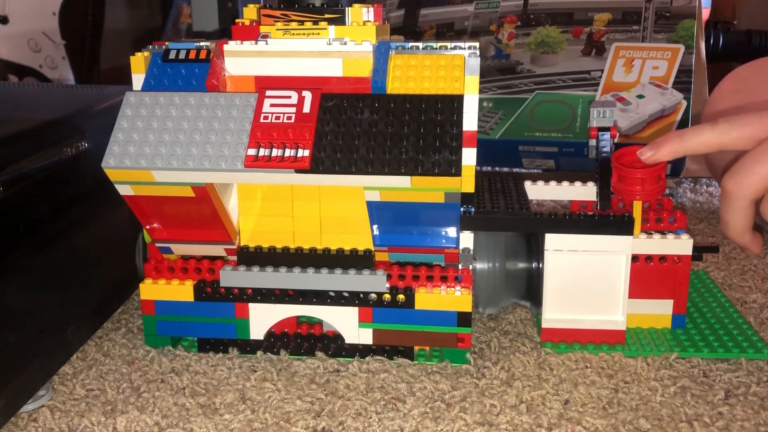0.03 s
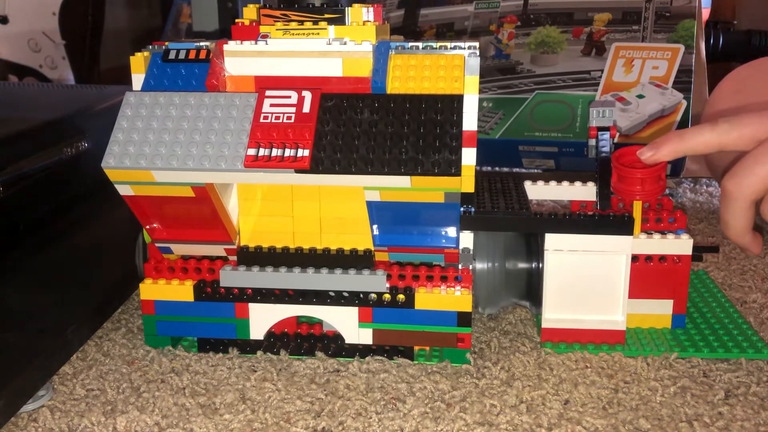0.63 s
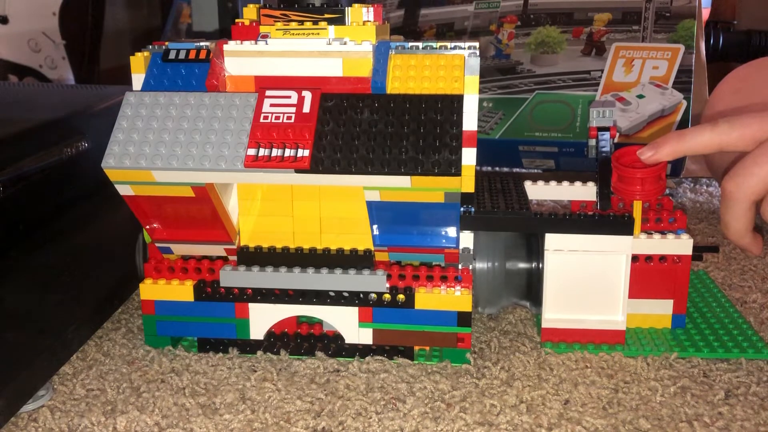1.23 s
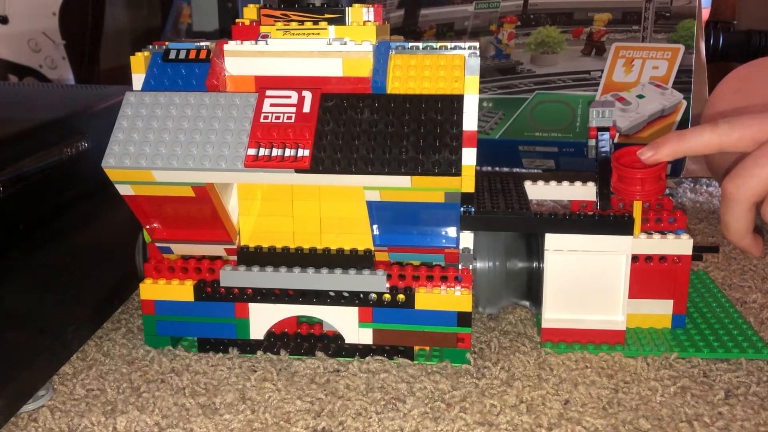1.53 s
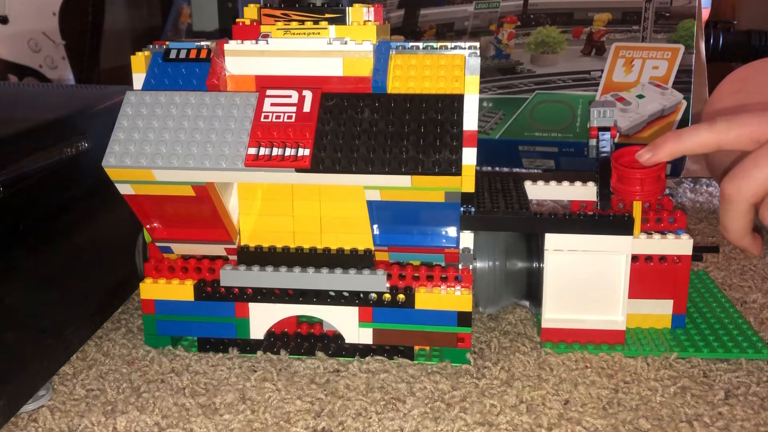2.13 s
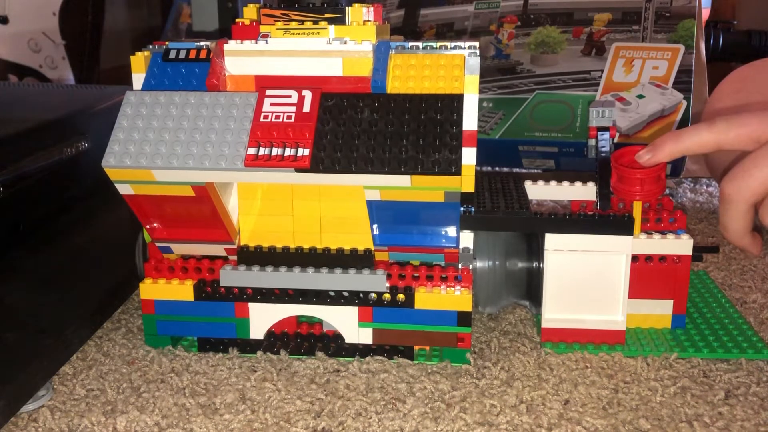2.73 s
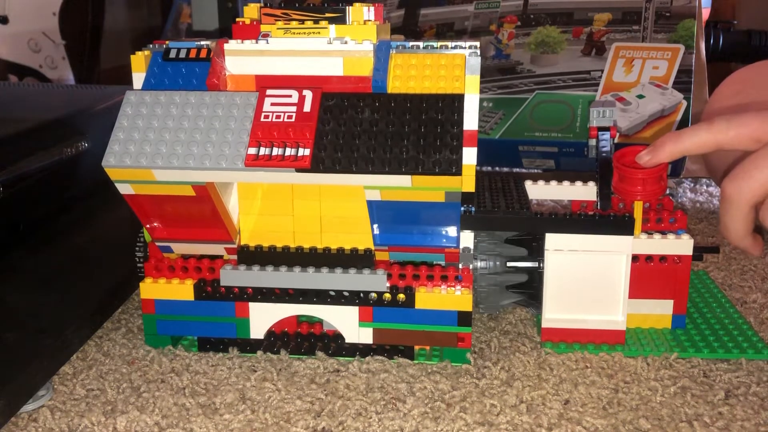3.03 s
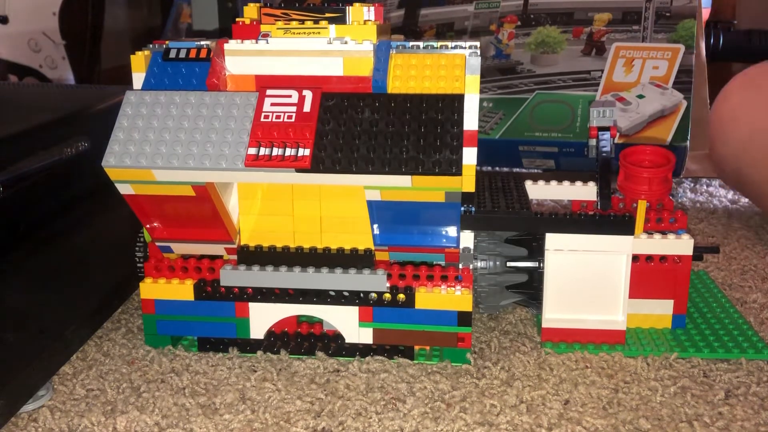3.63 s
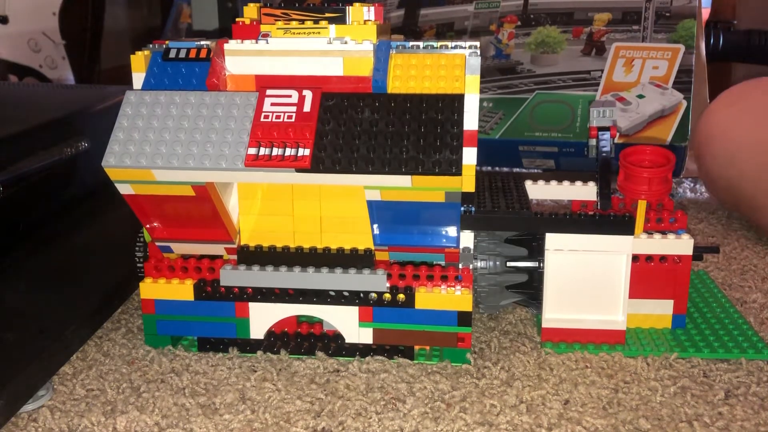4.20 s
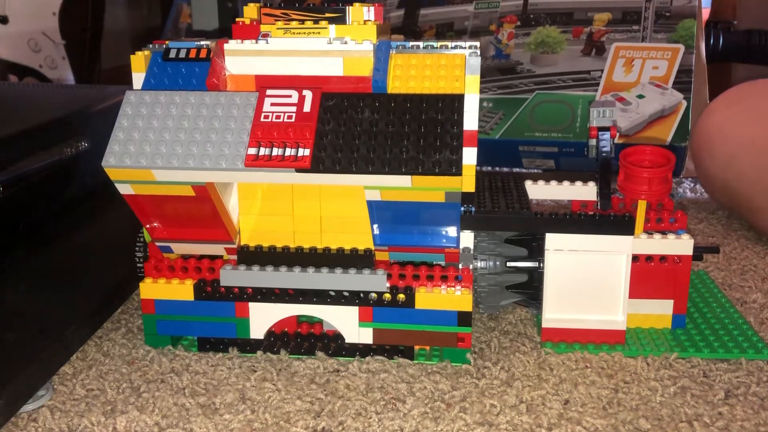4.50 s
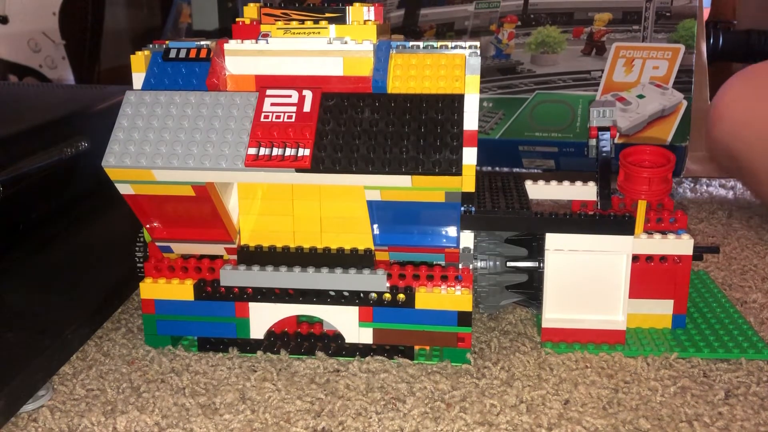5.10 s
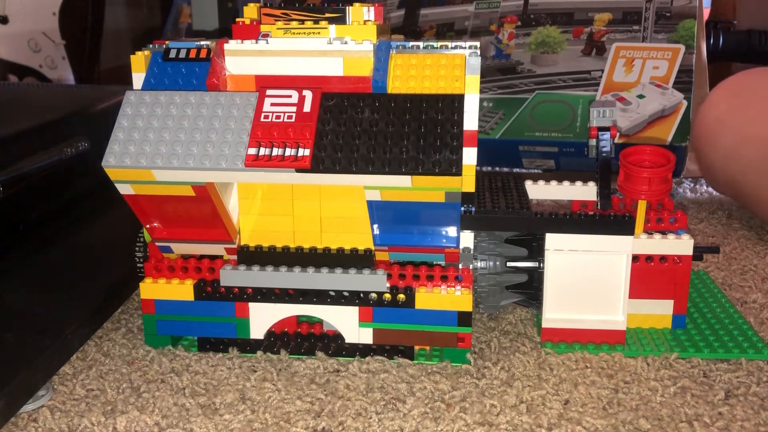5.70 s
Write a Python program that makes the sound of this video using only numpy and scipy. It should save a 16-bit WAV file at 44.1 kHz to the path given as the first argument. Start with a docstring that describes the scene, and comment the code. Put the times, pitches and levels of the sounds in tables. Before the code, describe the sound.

From the start, a vacuum cleaner draws air through a toy brick piston engine, close by in a small room. It makes a shrill hiss that chuffs about twelve times a second, with faint piston thumps, a thin throbbing whine and a low rumble underneath. The chuffing slows slightly around 2 seconds. From about 2.6 seconds the hiss swells, with a brief scuff of plastic on plastic. At 2.9 seconds the chuffing stops and air rushes into the open hose: a steady hiss and a fuller roar, with the fan's high whine settling slightly lower and growing louder. Soft low booms swell at about 3.5 and 4.4 seconds. At about 4.8 seconds the cleaner is switched off. Its tones slide down, the hiss dulls and the roar fades into a drone, the motor still running down at the end, around 5.6 seconds.

```python
"""A shrill hiss, chuffing about twelve times a second: a vacuum cleaner sucks air through the gaps
and valve of a toy-brick piston engine on a carpet while a finger holds the throttle.
The finger lifts, the engine stops, the open hose roars and the fan whines.
Then the cleaner is switched off; its tones fall and the roar fades as the motor runs down."""
import sys
import numpy as np
from scipy import signal
from scipy.fft import rfft, irfft, next_fast_len
from scipy.io import wavfile

SR = 44100
rng = np.random.default_rng(int(sys.argv[2]) if len(sys.argv) > 2 else 0)


def dump(signal):
    """Clip the signal to [-1, 1] and save it as 16-bit WAV at the path in sys.argv[1]."""
    limited = np.clip(np.atleast_2d(signal).T, -1, 1)
    pcm = np.round(limited * 32767).astype(np.int16)
    wavfile.write(sys.argv[1], SR, pcm)


N = 253575
TIME = np.arange(N) / SR
EASE_S, RELEASE_S, SWITCH_OFF_S = 2.58, 2.9, 4.835  # finger eases, finger lifts, power off

# hiss spectrum of the hose mouth: f/Hz, level/dB
HOSE_SPECTRUM = [(1500, -34.5), (3000, -22), (3800, -11.5), (4800, -17), (5800, -14), (6400, -12.5),
                 (6900, -1.5), (7900, -3), (8500, -15), (9300, -12), (10500, -20), (11500, -23),
                 (13500, -26), (16000, -31)]
# cross modes of the hose: f/Hz, width/Hz, lift/dB
HOSE_CROSS_MODES = [(3400, 280, 1.7), (4180, 46, 3.2), (5470, 79, 3.6), (6000, 58, 4), (7000, 39, 2),
                    (7505, 55, 6.9), (7740, 71, 2.8), (8540, 90, 5.4), (10300, 43, 2.3), (9960, 51, 4)]
# spectrum of the booms and the drone: f/Hz, level/dB
DRONE_SPECTRUM = [(25, -50), (50, -37), (80, -8.5), (150, -22), (185, 0.5), (215, -1), (270, 1), (320, -18),
                  (385, -8.5), (460, -17), (600, -39), (2000, -56)]


def brick_engine(throttle_db=-13.5, ease_db_per_s=12.5, gap_db=1.5, port_db=-12.9, thump_db=-32):
    """Air shrieks through the gaps; each turn the valve lets puffs through and the piston thumps."""
    # spectra of gap leaks, valve ports and piston: f/Hz, level/dB
    gap_spectrum = [(700, -27.5), (1500, -27), (2800, -23), (3600, -17.5), (4700, -13), (5800, -15),
                    (6600, -10.5), (7700, -3.5), (8400, -9.5), (9100, -11.5), (10000, -18.5), (12000, -23),
                    (14000, -28.5), (16000, -31)]
    port_spectrum = [(1000, -12), (2600, -13.5), (3300, -4), (4100, -2.5), (5200, -3), (6500, -14.5),
                     (10000, -19), (15000, -27)]
    thump_spectrum = [(20, -16), (35, -9), (58, 3), (100, -24), (200, -13), (550, 0), (900, -2),
                      (3000, -42)]
    # gap resonances: f/Hz, width/Hz, lift/dB
    gap_modes = [(7540, 420, 1.5), (7880, 110, 5.5), (4560, 200, 1), (4680, 140, -2), (5900, 91, 1.5),
                 (1857, 46, 6.5)]
    # valve openings: phase/turns, width/turns, level/dB
    puffs = [(.36, .06, 0), (.49, .08, -2.5), (.68, .06, -4)]
    turns = crank_turns()
    flow = from_db(throttle_db - ease_db_per_s * easing_s())
    leak_db = .3 * np.cos(2 * np.pi * (turns - .87)) + .5 * drift(45)  # louder with the valve shut
    gaps = air(gap_spectrum, gap_modes) * from_db(gap_db + leak_db)
    valve = rms_one(sum(from_db(db) * stroke(turns, at, width) for at, width, db in puffs))
    ports = from_db(port_db + 1.1 * drift(12)) * valve * air(port_spectrum)
    piston = air(thump_spectrum) * stroke(turns, at_turns=.2, width_turns=.035)
    return flow * (gaps + ports) + piston * from_db(thump_db)


def open_hose(suction_db=-19.5, flutter_db=.4, surge_db=.1, dull_hz=8500):
    """Air hisses over the hose mouth and rings its cross modes; the top fades as the fan slows."""
    hiss = air(HOSE_SPECTRUM, HOSE_CROSS_MODES)
    dull = signal.sosfiltfilt(signal.butter(2, dull_hz, fs=SR, output="sos"), hiss)
    brightness = coasting() ** 1.3
    gain = from_db(suction_db + flutter_db * drift(52) + surge_db * drift(5)) * coasting() ** 3.67
    return (dull + brightness * (hiss - dull)) * gain


def hose_roar(lumpy_db=1.15):
    """Lumpy flow drives the hose's lowest pipe resonances."""
    # flow spectrum: f/Hz, level/dB
    spectrum = [(100, -43), (200, -20), (315, -6.5), (380, -1), (460, -2.5), (540, 1.5), (600, -1),
                (720, -3.5), (790, -6.5), (900, -17), (1200, -11), (2000, -29), (8000, -65)]
    # pipe resonances: f/Hz, width/Hz, lift/dB
    pipe_modes = [(407, 26, 5), (440, 20, 2), (535, 45, 3), (624, 20, 6), (702, 20, 4.5), (836, 25, 5)]
    gain = flow_gain(choked_db=-33, free_db=-25.4, speed_power=3.3, choke_power=.65)
    return gain * from_db(lumpy_db * drift(37)) * air(spectrum, pipe_modes)


def fan_shriek(choked, gain_db=.7, throb_db=2, unchoke_loss_db=44):
    """The choked fan shrieks, throbbing in time with the piston."""
    # choked fan tones: f/motor speed, level/dB
    orders = [(10, -45), (18, -30.5)]
    tones = fan_tones(orders, wobble=.0011, waver_db=3, waver_hz=28)
    throb = np.cos(2 * np.pi * crank_turns())
    return tones * choked * from_db(gain_db + throb_db * throb - unchoke_loss_db * (1 - motor_choke()))


def fan_whine(choked):
    """The freed fan whines louder as the motor settles."""
    # free fan tones: f/motor speed, level/dB, loss when choked/dB
    orders = [(4, -32.5, 21), (12, -36, 10), (16, -24.5, 29), (20, -44, 6), (24, -54, 6)]
    settling = [(order, db - loss_db * np.sqrt(motor_choke())) for order, db, loss_db in orders]
    return fan_tones(settling, wobble=.0007, waver_db=1.5) * (1 - choked) * driven()


def fan_run_down():
    """Falling fan tones pass through the hose and flare where the slowing rotor shakes."""
    # coasting fan tones: f/motor speed, relative level/dB
    orders = [(4, -15.5), (12, -36), (16, -28.5), (20, -33), (26, -36), (28, -36)]
    # critical rotor speeds: f/Hz, half width/Hz, gain/dB
    criticals = [(540, 36, 3), (428, 10, -4), (382, 12, 0), (361, 8, -5)]
    tones = fan_tones(orders, wobble=.002, waver_db=2)
    shake = sum(from_db(db) * bell(motor_hz(), hz, width_hz) for hz, width_hz, db in criticals)
    return reflections(coloured(tones * (1 - driven()) * shake, HOSE_SPECTRUM, HOSE_CROSS_MODES))


def cleaner_body(choked, held_db=-30.5, swell_db_per_s=10):
    """The cleaner's body drums louder as the finger eases, dips at release and builds up again."""
    # body spectrum: f/Hz, level/dB
    spectrum = [(600, -3), (950, -2), (1300, -6), (1520, -1.5), (1750, -0.5), (2200, 0), (2500, -1.5),
                (2800, -4.5), (4000, -3), (4800, -13), (7000, -2), (15000, -22.5)]
    # body resonances: f/Hz, width/Hz, lift/dB
    modes = [(1098, 30, 8), (1212, 33, 6), (1390, 40, 3), (1700, 60, 5), (1840, 60, 3), (2460, 60, 6)]
    held = from_db(held_db + swell_db_per_s * easing_s())
    released = flow_gain(choked_db=-35, free_db=-28.4, speed_power=2.17, choke_power=.6)
    return (choked * held + (1 - choked) * released) * air(spectrum, modes)


def hose_rumble(gust_db=2.5, boom_half_s=.056):
    """The hose rumbles, gusts buffet its mouth and low booms swell up."""
    # spectra of rumble and gusts: f/Hz, level/dB
    rumble_spectrum = [(15, -50), (30, -49), (58, -13), (95, -18), (135, -8.5), (185, -2.5), (230, -8),
                       (280, 0), (315, -23), (500, -32), (2000, -73)]
    gust_spectrum = [(20, -48), (40, -35), (60, -22), (85, 2), (130, -2), (165, 2), (225, -9), (280, -5.5),
                     (315, -5.5), (500, -27), (2000, -60)]
    # rumble resonance: f/Hz, width/Hz, lift/dB
    modes = [(188, 22, 7)]
    # boom peaks: t/s, level/dB
    peaks = [(.21, -30.5), (3.53, -31), (4.35, -25.5)]
    rumble = flow_gain(choked_db=-38, free_db=-32, speed_power=1.8) * air(rumble_spectrum, modes)
    gust_gain = flow_gain(choked_db=-46.5, free_db=-39.5, speed_power=1.4)
    gusts = gust_gain * from_db(gust_db * drift(2.3)) * air(gust_spectrum)
    booms = sum(from_db(db) * bell(TIME, at_s, boom_half_s) for at_s, db in peaks) * air(DRONE_SPECTRUM)
    return rumble + gusts + booms


def casing_drone(level_db=-36, rise_s=.15):
    """The coasting cleaner drones and rings in its casing."""
    # casing resonances: f/Hz, width/Hz, lift/dB
    modes = [(1800, 100, 40), (1880, 60, 55)]
    onset = np.clip((TIME - SWITCH_OFF_S) / rise_s, 0, 1)
    return onset * from_db(level_db) * coasting() ** .3 * air(DRONE_SPECTRUM, modes)


def throttle_scuff(at_s=2.7, half_s=.055, hz=1900, width_hz=800, level_db=-27):
    """Plastic rubs briefly on plastic as the finger eases off."""
    rub = resonate(resonate(rng.standard_normal(N), hz, width_hz), hz, width_hz)
    return rms_one(rub) * from_db(level_db) * bell(TIME, at_s, half_s)


def reflections(x, echo_db=-10, t60_s=.09, lowest_hz=900):
    """Dense early echoes from bricks, boxes and walls ripple the treble."""
    t = np.arange(round(SR / 5)) / SR
    echoes = rng.standard_normal(len(t)) * from_db(-60 * t / t60_s) * (t > .002)
    echoes = signal.sosfilt(signal.butter(2, lowest_hz, "high", fs=SR, output="sos"), echoes)
    wet = signal.fftconvolve(x, echoes / np.linalg.norm(echoes))[:N]
    return (x + from_db(echo_db) * wet) / np.sqrt(1 + from_db(2 * echo_db))


def crank_turns():
    """Running angle of the engine's crank."""
    # crank speed: t/s, f/Hz
    speeds = [(0, 12), (.45, 12), (.55, 11.8), (1.62, 11.8), (1.72, 11.53), (2.05, 11.5), (2.2, 10.9),
              (2.4, 11), (2.55, 11.6), (2.95, 11)]
    crank_hz = np.interp(TIME, *np.transpose(speeds))
    return .756 + np.cumsum(crank_hz) / SR


def stroke(turns, at_turns, width_turns):
    """One smooth bump per crank turn."""
    return np.exp((np.cos(2 * np.pi * (turns - at_turns)) - 1) / (2 * np.pi * width_turns) ** 2)


def easing_s():
    """Time since the finger began to ease off."""
    return np.maximum(TIME - EASE_S, 0)


def motor_choke(settle_s=.4):
    """1 under the finger, sinking to 0 after it eases off."""
    return 1 / (1 + (easing_s() / settle_s) ** 2.6)


def coasting(half_speed_s=.99):
    """Share of motor speed kept: 1 until switch-off, then air drag slows it."""
    return 1 / (1 + np.maximum(TIME - SWITCH_OFF_S, 0) / half_speed_s)


def driven():
    """Quick crossfade at switch-off: 1 powered, 0 coasting."""
    return coasting() ** 25


def motor_hz(choked_hz=618.1, free_hz=587.4):
    """The motor races while choked, settles in free flow, then coasts."""
    return (free_hz + (choked_hz - free_hz) * motor_choke()) * coasting()


def fan_tones(orders, wobble, waver_db, waver_hz=18):
    """Multiples of the motor speed, each wavering in the turbulent air."""
    angle = 2 * np.pi * np.cumsum(motor_hz() * (1 + wobble * drift(25))) / SR
    return np.sqrt(2) * sum(np.sin(round(order) * angle) * from_db(db + waver_db * drift(waver_hz))
                            for order, db in orders)


def flow_gain(choked_db, free_db, speed_power, choke_power=1):
    """Flow noise builds from its choked to its free level, then dies with the motor speed."""
    level_db = free_db + (choked_db - free_db) * motor_choke() ** choke_power
    return from_db(level_db) * coasting() ** speed_power


def air(spectrum, modes=()):
    """Turbulent noise ringing a cavity; rms 1, so spectrum levels are relative."""
    return rms_one(coloured(rng.standard_normal(N), spectrum, modes))


def coloured(x, spectrum, modes):
    """Cavity filter: a broad spectrum lifted by narrow resonances."""
    size = next_fast_len(N + SR // 4)
    hz = np.maximum(np.fft.rfftfreq(size, 1 / SR), 1)
    points_hz, db = np.transpose(spectrum)
    skirts = 1 / np.sqrt((1 + (points_hz[0] / 2 / hz) ** 4) * (1 + (hz / 2 / points_hz[-1]) ** 4))
    gain = from_db(np.interp(np.log(hz), np.log(points_hz), db)) * skirts
    broad = irfft(rfft(x, size) * gain, size)[:N]
    return broad + sum((from_db(lift) - 1) * resonate(broad, f, width) for f, width, lift in modes)


def resonate(x, hz, width_hz):
    """One resonance, peak gain 1."""
    r = np.exp(-np.pi * width_hz / SR)
    feedback = [1, -2 * r * np.cos(2 * np.pi * hz / SR), r * r]
    return signal.lfilter(np.array([1, 0, -1]) * (1 - r * r) / 2, feedback, x)


def drift(rate_hz):
    """Slow random wander, rms 1."""
    hop, warm_up = 40, 2000
    r = np.exp(-2 * np.pi * rate_hz * hop / SR)
    noise = rng.standard_normal(N // hop + warm_up + 2)
    slow = signal.lfilter([1], [1, -2 * r, r * r], noise)[warm_up:]
    return np.interp(np.arange(N) / hop, np.arange(len(slow)), rms_one(slow))


def bell(x, centre, half_width):
    """Gaussian bump, peak 1."""
    return np.exp(-((x - centre) / half_width) ** 2)


def from_db(db):
    """Decibels to gain."""
    return 10 ** (np.asarray(db) / 20)


def rms_one(x):
    """Scale to rms 1."""
    return x / np.sqrt(np.mean(x ** 2) + 1e-20)


def scene(changeover_s=.016):
    """Air runs through the engine until the finger lifts, then bypasses it; both channels alike."""
    choked = .5 - .5 * np.tanh((TIME - RELEASE_S) / changeover_s)
    flow = np.sqrt(choked) * brick_engine() + np.sqrt(1 - choked) * open_hose()
    cleaner = hose_roar() + cleaner_body(choked) + hose_rumble() + casing_drone()
    noises = reflections(flow + cleaner + throttle_scuff())
    fan = fan_shriek(choked) + fan_whine(choked) + fan_run_down()
    return np.tile(noises + fan, (2, 1))


def record(dry, cutoff_hz=15800):
    """Peak clip, then a steep low-pass."""
    lowpass = signal.ellip(12, .1, 90, cutoff_hz, fs=SR, output="sos")
    return signal.sosfilt(lowpass, np.clip(dry, -.9, .9))


dry = scene()
out = record(dry)
dump(out)
```